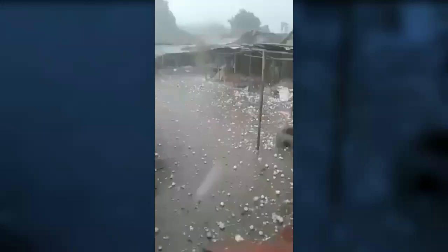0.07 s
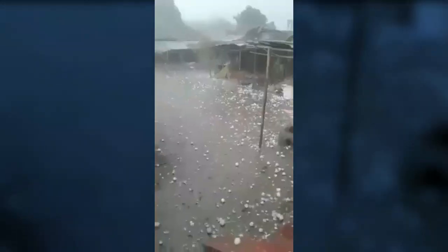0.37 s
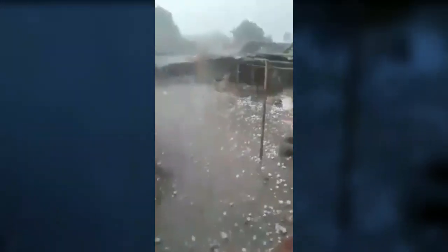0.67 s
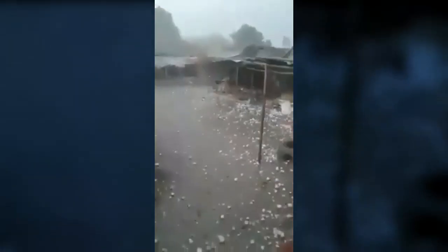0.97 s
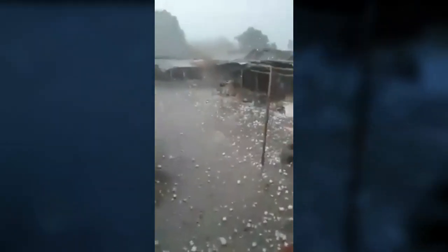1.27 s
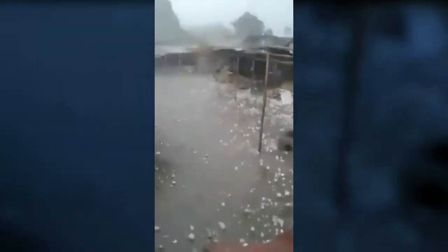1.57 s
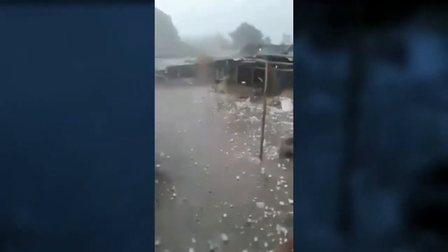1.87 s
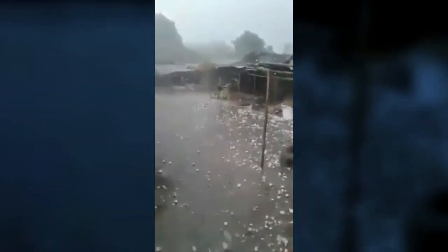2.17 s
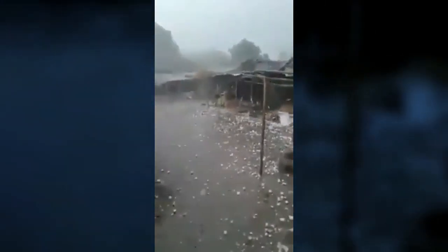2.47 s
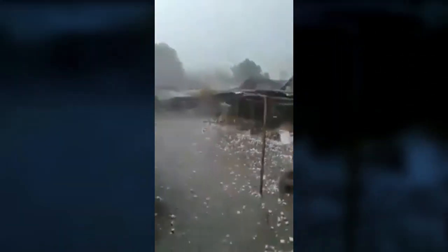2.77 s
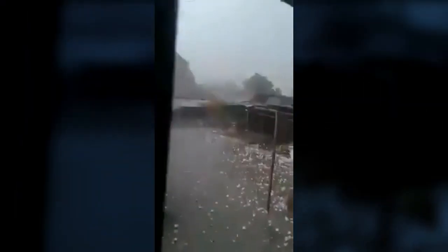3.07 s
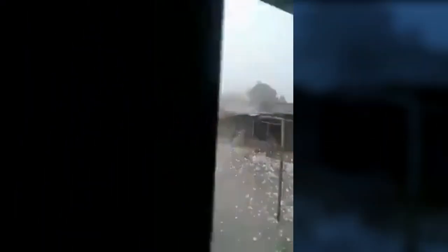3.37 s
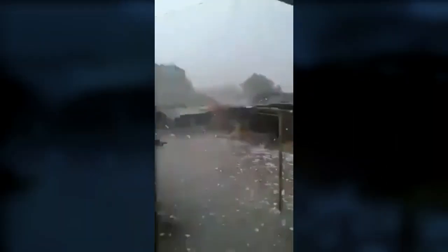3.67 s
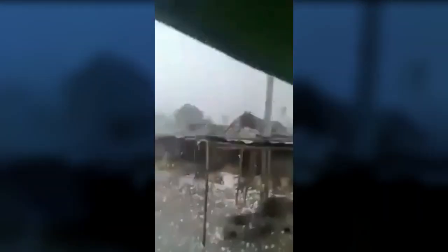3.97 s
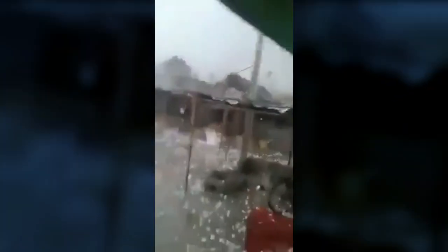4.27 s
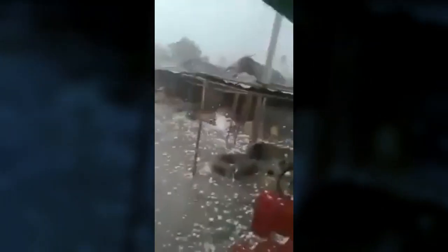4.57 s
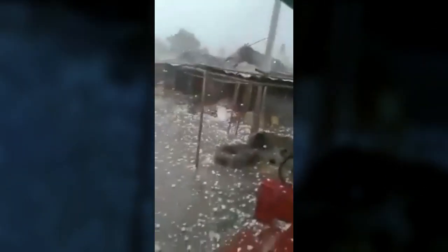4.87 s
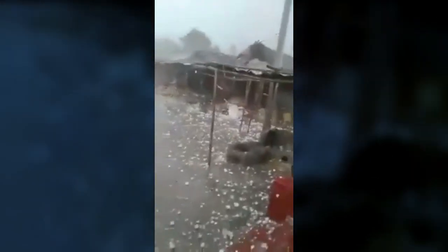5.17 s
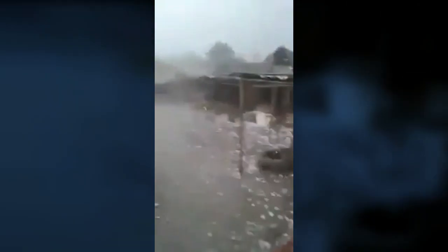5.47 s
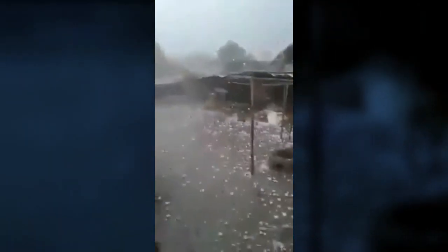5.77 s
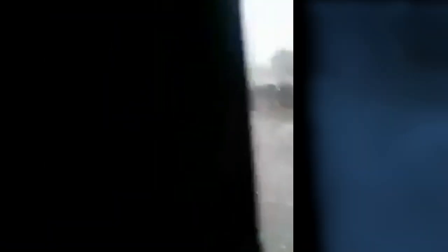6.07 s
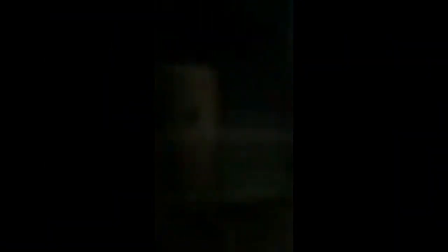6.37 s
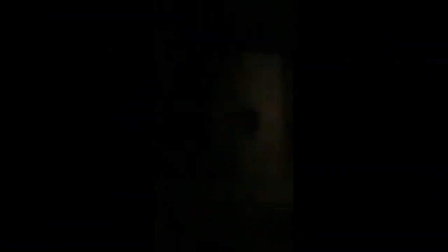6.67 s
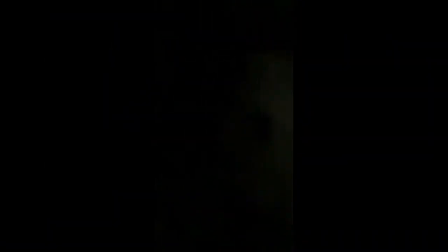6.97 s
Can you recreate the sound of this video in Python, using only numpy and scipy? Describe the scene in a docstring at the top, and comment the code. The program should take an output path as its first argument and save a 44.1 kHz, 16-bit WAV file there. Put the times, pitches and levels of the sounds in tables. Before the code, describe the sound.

After silence, a heavy hailstorm fades in quickly at about 0.8 seconds, heard from a doorway facing a flooded yard. Countless stones clatter on the ground, drum on shed roofs and ping on corrugated tin. Near ones crack sharply, and rain and spray hiss off the water with a glassy glitter. Short, irregular gusts of wind rumble throughout, briefly thinning the hiss and pushing the hail down before it swells back. Stronger flurries of ice hit around 1.9 and 3.8 seconds. From about 4.5 seconds the clatter and spray grow a little denser and the tin pings slightly higher. Around 6 seconds the storm takes on a hollow ring as the microphone moves back under the roof, and it stays loud until the end at about 7.2 seconds. The sound lacks the highest treble, and its loudest peaks distort with faint ticks.

```python
"""Heavy hail on a flooded yard

Heard from a doorway, countless stones clatter on the ground, drum on shed roofs and ping on tin.
Near ones crack sharply, and spray hisses off the water. Each sound surges over a steady bed.
Gusts rumble over it all, thin the hiss and push the automatic volume down.
The sound lacks top treble, and its loudest peaks clip with faint ticks."""
import sys
import numpy as np
from scipy import signal
from scipy.fft import rfft, irfft, next_fast_len
from scipy.io import wavfile
from scipy.ndimage import uniform_filter1d

SR = 44100
rng = np.random.default_rng(int(sys.argv[2]) if len(sys.argv) > 2 else 0)


def store_pcm(level_fs):
    """Save levels as 16-bit WAV."""
    pcm = np.round(np.clip(level_fs, -1, 1) * 32767).astype(np.int16)
    wavfile.write(sys.argv[1], SR, np.atleast_2d(pcm).T)


N = 318843

# tone colour of the spray and its glitter: (frequency [Hz], level [dB])
SPRAY_SPECTRUM = [(2000, -9), (2800, 0.5), (3700, 0.5), (4600, -4), (5500, -6.5), (6400, -11.6),
                  (7400, -13), (8400, -17.8), (9500, -23)]


def from_db(db):
    """Turn decibels into a number to multiply a sound by."""
    return 10 ** (np.asarray(db) / 20)


def unit_power(x):
    """Scale a sound to an average power of 1."""
    return x / np.sqrt(np.mean(x ** 2) + 1e-20)


def over_time(rows):
    """Turn a table that starts with a time column into one curve for each other column."""
    times, *columns = np.transpose(rows)
    return [np.interp(np.arange(N) / SR, times, column) for column in columns]


def gain_at(spectrum, hz):
    """Look up how strong a spectrum is at a frequency."""
    points_hz, levels_db = np.transpose(spectrum)
    return from_db(np.interp(np.log(hz), np.log(points_hz), levels_db))


def shaped(x, spectrum):
    """Give a sound the tone colour of a spectrum, at a power of 1."""
    size = next_fast_len(N)
    hz = np.maximum(np.arange(size // 2 + 1) * SR / size, 1)
    inside = (hz > spectrum[0][0] / 2) & (hz < spectrum[-1][0] * 2)
    return unit_power(irfft(rfft(x, size) * gain_at(spectrum, hz) * inside, size)[:N])


def drift(rate_hz):
    """A smooth random wobble, about 1 in size."""
    step = 40   # samples between random values
    decay = np.exp(-2 * np.pi * rate_hz * step / SR)
    noise = rng.standard_normal(N // step + 2002)
    slow = signal.lfilter([1], [1, -2 * decay, decay * decay], noise)[2000:]
    return np.interp(np.arange(N) / step, np.arange(len(slow)), unit_power(slow))


def bend_pitch(x, speed):
    """Play a sound at a changing speed: faster is higher."""
    return np.interp(np.cumsum(speed), np.arange(N), x, period=N)


def surging(steady_db, surges, rise_s=.034, fall_s=.028):
    """Strength of a steady source plus surges that rise, hold and fall; their powers add."""
    t = np.arange(N) / SR
    power = from_db(steady_db) ** 2
    for start, length, db in surges:
        span = slice(*np.searchsorted(t, [start, start + length + fall_s]))
        rise = np.clip((t[span] - start) / rise_s, 0, 1)
        fall = np.clip(1 - (t[span] - start - length) / fall_s, 0, 1)
        power[span] += (from_db(db) * rise * fall) ** 2
    return np.sqrt(power)


def impacts(per_s, spread_db):
    """Stones land at random moments; most are small or far, a few are big."""
    when, chance, sign = rng.random((40000, 3))[:int(per_s * N / SR)].T
    size = np.minimum(-np.log(1 - chance), 4)
    hits = np.zeros(N)
    hits[(when * N).astype(int)] = from_db(spread_db * size) * np.sign(sign - .5)
    return hits


def patter(spectrum, per_s, spread_db):
    """A dense patter: each band, a third of an octave wide, rings with its own stream of hits."""
    edges_hz = 1000 * 2 ** (np.arange(-9, 11) / 3)
    bands = np.zeros(N)
    for low, high in zip(edges_hz, edges_hz[1:]):
        if high > spectrum[0][0] and low < spectrum[-1][0]:
            band_pass = signal.butter(2, [low, high], "band", fs=SR, output="sos")
            band = signal.sosfilt(band_pass, impacts(per_s, spread_db) + 1e-18)
            bands += unit_power(band) * np.sqrt(high - low)
    return shaped(bands, spectrum)


def ring(hits, hz, fade_s):
    """Each hit starts a pure tone that dies away by 60 dB in fade_s."""
    decay = from_db(-60 / (fade_s * SR))
    angle = 2 * np.pi * hz / SR
    feedback = [1, -2 * decay * np.cos(angle), decay * decay]
    return signal.lfilter([0, np.sin(angle)], feedback, hits + 1e-18)


def splash(hits, fade_s):
    """Each hit throws up droplets and chips: a burst of noise that dies away by 60 dB in fade_s."""
    decay = from_db(-120 / (fade_s * SR))
    energy = signal.lfilter([1], [1, -decay], hits ** 2 + 1e-18)
    return np.sqrt(energy) * rng.standard_normal(N)


def far_rain():
    """Distant rain merges into an even hiss."""
    # tone colour of the rain: (frequency [Hz], level [dB])
    rain_spectrum = [(2000, -12), (4000, 3), (7000, 18), (9500, -17), (11000, -32)]
    return from_db(-37.5) * shaped(rng.standard_normal(N), rain_spectrum)


def wind():
    """Swirling air makes a low, lumpy rumble."""
    # tone colour of the wind: (frequency [Hz], level [dB])
    wind_spectrum = [(25, -35), (50, -21.5), (80, -9), (125, -4.5), (200, -.7), (320, 1), (450, -.5),
                     (600, -8), (1000, -16), (2000, -27)]
    return shaped(rng.standard_normal(N) * from_db(1.2 * drift(rate_hz=26)), wind_spectrum)


def glitter():
    """The treble glitters with short, glassy tones that never settle on one pitch."""
    pitches_hz = np.geomspace(3200, 9300, num=44) * rng.uniform(.99, 1.01, size=44)
    tones = np.zeros(N)
    for hz in pitches_hz:
        gain = gain_at(SPRAY_SPECTRUM, hz) * np.sqrt(hz)
        tones += gain * ring(impacts(per_s=28, spread_db=2.4), hz, fade_s=.11)
    return unit_power(bend_pitch(tones, speed=1 + .02 * drift(rate_hz=.5)))


def spray(near_hits):
    """Fine drops fizz on the water, near stones add short splashes, and the treble glitters."""
    fizz = patter(SPRAY_SPECTRUM, per_s=2800, spread_db=2.4)
    high_pass = signal.butter(4, SPRAY_SPECTRUM[0][0], "high", fs=SR, output="sos")
    bursts = signal.sosfilt(high_pass, splash(near_hits, fade_s=.05))
    splashes = shaped(bursts, SPRAY_SPECTRUM)
    return unit_power(fizz + from_db(-3.5) * splashes + from_db(-2) * glitter())


def roof_drumming():
    """Hail knocks on the shed roofs; bigger stones set the hollow panels ringing."""
    # tone colour of the roofs: (frequency [Hz], level [dB])
    roof_spectrum = [(150, -9), (300, -9.5), (450, -4), (580, -2.5), (830, 0), (1000, -1.5), (1250, -2),
                     (1600, -5.5), (2400, -15)]
    knocks = patter(roof_spectrum, per_s=600, spread_db=2.5)
    pitches_hz = np.geomspace(380, 1400, num=26) * rng.uniform(.98, 1.02, size=26)
    panels = np.zeros(N)
    for hz in pitches_hz:
        panels += gain_at(roof_spectrum, hz) * ring(impacts(per_s=20, spread_db=3), hz, fade_s=.13)
    return unit_power(knocks + from_db(-2) * unit_power(panels))


def tin_sheets():
    """Corrugated tin gives a cluster of close pings whose pitch rises slightly partway through."""
    # middle pitch of the pings: (time [s], pitch [Hz])
    tin_pitch = [(.8, 2237), (4.1, 2220), (4.5, 2388), (5.3, 2403), (6.0, 2327), (6.6, 2417), (7.23, 2374)]
    middle_hz = 2300
    offsets = np.linspace(-1, 1, num=30) + rng.uniform(-.02, .02, size=30)
    pings = np.zeros(N)
    for offset in offsets:
        hits = impacts(per_s=22, spread_db=2)
        pings += from_db(-9 * offset ** 2) * ring(hits, middle_hz + 520 * offset, fade_s=.13)
    (pitch_hz,) = over_time(tin_pitch)
    return unit_power(bend_pitch(pings, speed=pitch_hz / middle_hz))


def clatter(near_hits):
    """Distant ice clicks on the ground, with pinging tin and the cracks of near stones on top."""
    # tone colour of ice on hard ground: (frequency [Hz], level [dB])
    ice_spectrum = [(900, -13.5), (1400, -4), (1800, 0.3), (2150, -1), (2600, -.6), (2850, -3.3),
                    (3300, -8.2), (5000, -36)]
    clicks = patter(ice_spectrum, per_s=1300, spread_db=2.5)
    cracks = shaped(splash(near_hits, fade_s=.029), ice_spectrum)
    return unit_power(clicks + from_db(-5.5) * cracks + from_db(-1) * tin_sheets())


def shelter(storm):
    """As the listener steps back under the roof, the storm takes on a hollow ring."""
    # how much hollow ring is added: (time [s], share [0 to 1])
    ring_share = [(5.7, 0.0027), (6.0, .25), (6.5, 0.31), (7.23, 0.27)]
    # where the space under the roof rings: (frequency [Hz], width [Hz])
    resonances = [(440, 100), (840, 193)]
    (share,) = over_time(ring_share)
    filters = [signal.iirpeak(hz, hz / width, fs=SR) for hz, width in resonances]
    hollow = sum(signal.lfilter(b, a, storm) for b, a in filters)
    return storm + share * hollow


def automatic_volume(x, aim_db=-7.45, strength=.6, listen_s=.035):
    """The level is pulled partway to a target, so gusts push the hail down and it swells back after."""
    power = uniform_filter1d(x[0] ** 2, size=int(listen_s * SR))
    level_db = 10 * np.log10(np.maximum(power, 1e-9))
    return x * from_db(strength * (aim_db - level_db))


def limiter(x, ceiling, release_db_per_s):
    """The volume dips within a millisecond of a peak and soon recovers; the sharpest slip through."""
    over_db = 20 * np.log10(np.maximum(np.abs(x[0]) / ceiling, 1))
    recovery_db = release_db_per_s * np.arange(N) / SR
    dip_db = np.maximum.accumulate(over_db + recovery_db) - recovery_db
    return x * from_db(-uniform_filter1d(dip_db, size=31))


def clip_peaks(x, hardness):
    """Peaks that are too loud get squashed: hardness 2 rounds them gently, 50 cuts them flat."""
    return x / (1 + np.abs(x) ** hardness) ** (1 / hardness)


def scene():
    """Wind, roofs and yard together, each a steady bed with surges, heard from the shelter."""
    # the storm beneath the surges: (time [s], wind [dB], roofs [dB], clatter [dB], spray [dB])
    steady_storm = [(0.8, -19.9, -15.9, -16.0, -23.7), (1.15, -20.1, -20.2, -15.6, -21.5),
                    (1.25, -18.1, -18.4, -14.7, -19.5), (1.9, -19.6, -16.2, -13.0, -15.2),
                    (2.4, -19.1, -14.9, -12.1, -17.5), (3.0, -18.2, -15.6, -12.3, -16.3),
                    (3.55, -21.3, -17.1, -12.3, -14.9), (4.0, -19.2, -15.2, -12.9, -17.8),
                    (4.55, -21.1, -16.6, -10.0, -14.9), (5.2, -17.4, -16.1, -10.6, -13.5),
                    (5.7, -19.5, -14.4, -10.2, -13.4), (6.1, -19.0, -15.6, -10.3, -13.3),
                    (6.85, -20.6, -13.6, -12.7, -14.7), (7.23, -17.9, -13.7, -11.4, -15.9)]
    # gusts of wind: (start [s], length [s], level [dB])
    gusts = [(0.757, 0.17, -18.0), (0.99, 0.07, -18.0), (1.072, 0.1, -19.5), (1.346, 0.07, -14.0),
             (1.646, 0.08, -12.0), (1.979, 0.04, -15.0), (2.141, 0.29, -14.5), (2.497, 0.07, -16.0),
             (2.773, 0.15, -14.0), (2.979, 0.12, -16.0), (3.108, 0.09, -16.0), (3.205, 0.05, -11.5),
             (3.353, 0.03, -12.5), (3.639, 0.13, -14.5), (3.827, 0.09, -13.0), (4.0, 0.21, -14.5),
             (4.36, 0.1, -17.0), (4.663, 0.11, -18.0), (4.8, 0.12, -14.0), (5.201, 0.16, -14.0),
             (5.852, 0.25, -17.5), (6.168, 0.09, -13.0), (6.348, 0.09, -12.0), (6.505, 0.08, -17.0),
             (6.691, 0.27, -14.0), (6.973, 0.06, -12.5), (7.14, 0.07, -13.0)]
    # swells of hiss, many just as a gust ends: (start [s], length [s], level [dB])
    hiss_swells = [(0.839, 0.08, -20.5), (0.965, 0.06, -19.5), (1.156, 0.42, -17.0), (1.478, 0.06, -18.0),
                   (1.843, 0.09, -16.5), (2.254, 0.09, -17.5), (2.421, 0.3, -17.0), (2.902, 0.11, -18.0),
                   (3.225, 0.22, -18.5), (3.77, 0.21, -17.5), (4.198, 0.12, -17.5), (4.49, 0.28, -16.0),
                   (4.946, 0.17, -16.5), (6.253, 0.13, -16.0), (6.907, 0.3, -15.5)]
    # volleys of hail on the roofs: (start [s], length [s], level [dB])
    roof_volleys = [(1.154, 0.14, -16.0), (1.405, 0.08, -14.5), (1.842, 0.15, -12.0), (2.109, 0.09, -16.0),
                    (2.242, 0.18, -15.0), (3.194, 0.07, -12.0), (3.579, 0.14, -16.0), (3.804, 0.05, -12.0),
                    (3.945, 0.23, -19.0), (4.247, 0.18, -15.5), (4.622, 0.05, -14.0), (4.701, 0.12, -14.5),
                    (4.908, 0.07, -13.5), (5.14, 0.07, -14.0), (5.243, 0.12, -13.5), (5.625, 0.04, -12.0),
                    (5.823, 0.44, -14.5), (6.157, 0.06, -14.5), (6.333, 0.25, -13.5), (6.756, 0.28, -14.0),
                    (7.138, 0.09, -10.0)]
    # flurries of stones on hard ground: (start [s], length [s], level [dB])
    ice_flurries = [(0.816, 0.08, -14.5), (1.178, 0.06, -13.0), (1.249, 0.05, -15.0), (1.467, 0.07, -13.5),
                    (1.64, 0.06, -13.0), (1.853, 0.12, -9.5), (2.437, 0.2, -15.0), (2.911, 0.06, -15.0),
                    (3.119, 0.18, -14.0), (3.798, 0.06, -8.5), (4.266, 0.05, -14.5), (5.165, 0.06, -13.0),
                    (5.34, 0.07, -11.5), (6.491, 0.05, -13.5)]
    wind_db, roof_db, clatter_db, spray_db = over_time(steady_storm)
    blowing = surging(wind_db, gusts, fall_s=.022)
    gustiness = blowing / from_db(-20)   # above 1, the wind thins the sound of the yard
    hiss_thinning = gustiness ** .31   # .31 dB lost for each dB the wind rises
    clatter_thinning = gustiness ** .11
    near_hits = impacts(per_s=200, spread_db=.5)   # the same stones crack and splash
    storm = blowing * wind()
    storm += surging(roof_db, roof_volleys) * roof_drumming()
    storm += surging(clatter_db, ice_flurries) / clatter_thinning * clatter(near_hits)
    storm += surging(spray_db, hiss_swells) / hiss_thinning * spray(near_hits)
    storm += far_rain() / hiss_thinning
    return shelter(storm)[None]


def record(dry):
    """The evened-out sound fades in, lacks top treble, and its loudest peaks clip with faint ticks."""
    # the sound fades in: (time [s], share of full strength [0 to 1])
    fade_in = [(.754, 0), (.762, 0.28), (.80, 0.61), (.86, 1)]
    (fade,) = over_time(fade_in)
    treble_top_hz, tick_top_hz = 9550, 16000
    treble_filter = signal.ellip(10, .1, 80, treble_top_hz, fs=SR, output="sos")
    tick_filter = signal.ellip(8, .1, 70, tick_top_hz, fs=SR, output="sos")
    heard = signal.sosfilt(treble_filter, automatic_volume(dry) * fade)
    held = limiter(heard, ceiling=.93, release_db_per_s=900)
    return signal.sosfilt(tick_filter, clip_peaks(held, hardness=28))


dry = scene()
out = record(dry)
store_pcm(out)
```